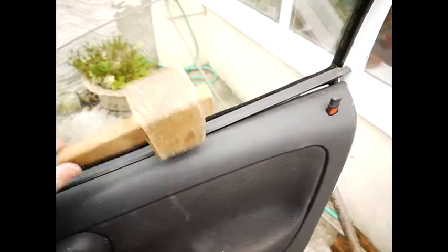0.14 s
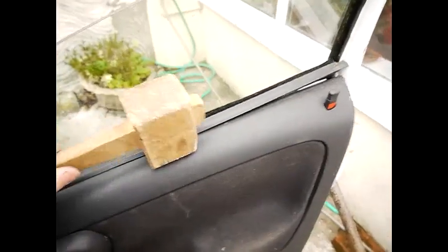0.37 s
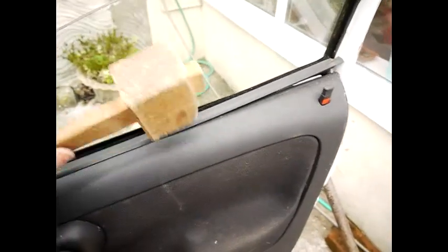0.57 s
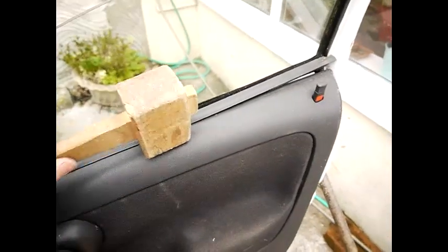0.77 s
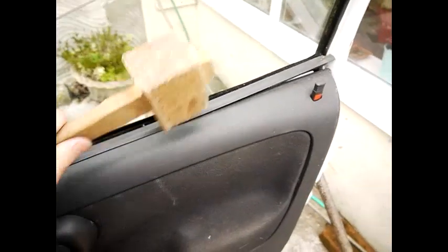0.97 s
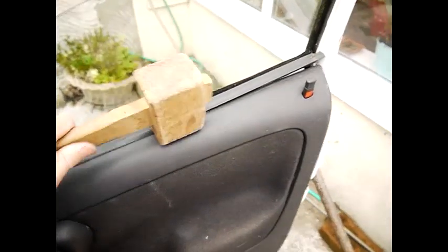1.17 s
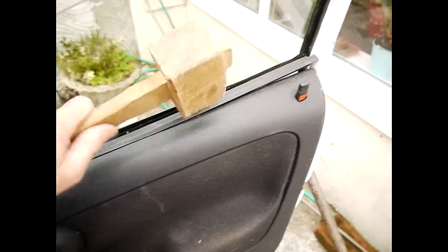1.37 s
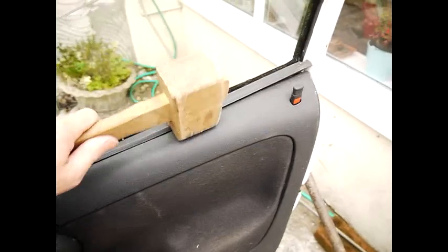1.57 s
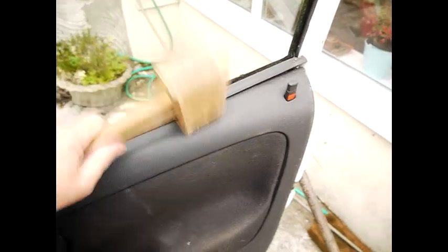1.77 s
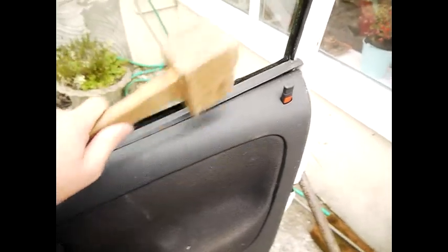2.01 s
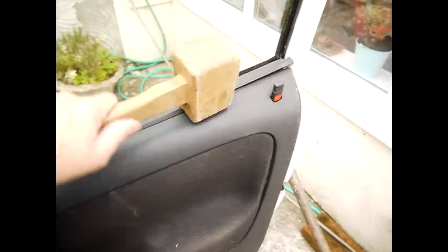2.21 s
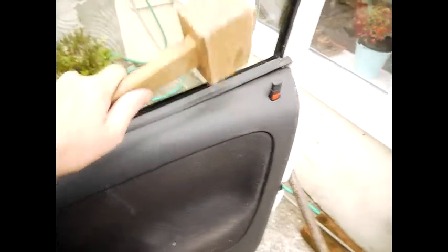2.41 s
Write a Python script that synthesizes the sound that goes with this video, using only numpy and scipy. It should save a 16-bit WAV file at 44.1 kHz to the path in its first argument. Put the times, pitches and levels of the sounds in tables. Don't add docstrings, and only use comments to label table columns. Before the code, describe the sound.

Wooden mallet knocking hard on a plastic car door trim, dull taps alternating with loud rattling blows

```python
import sys
import numpy as np
from scipy import signal
from scipy.io import wavfile
from scipy.ndimage import uniform_filter1d

SR = 44100
rng = np.random.default_rng(int(sys.argv[2]) if len(sys.argv) > 2 else 0)


def to_wav(sig):
    pcm = np.clip(np.atleast_2d(sig), -1, 1) * 32767
    pcm = np.round(pcm).astype(np.int16)
    wavfile.write(sys.argv[1], SR, pcm.T)


def gain_from_db(level_db):
    decades = np.asarray(level_db, float) / 20
    return 10 ** decades


N = 108045

# pitch_hz, level_db
ROAD_COLOUR = [(30, -23.5), (80, -6), (115, -14.5), (160, -6.5), (800, -4.5), (2500, -16), (6300, -30),
               (12000, -62)]
# pitch_hz, width_hz, level_db
ROAD_HUMS = [(150, 25, 5), (950, 300, 5), (1780, 200, 5)]
# time_s, level_db
ROAD_LEVEL = [(0, -2), (.15, 5), (.6, 2.5), (1, -0.5), (1.35, -0.5), (1.75, -2.5), (2.1, -3.5), (2.45, -1)]
# pitch_hz, likeness_0_to_1
PORT_LIKENESS = [(60, 0.77), (240, 0.9), (950, 1.0), (3770, 0.97), (15000, 0.66)]
# start_s, peak_db, thud_pitch_hz
TAPS = [
    (-.012, -3, 800),
    (.2236, -5, 800),
    (.6615, -4.5, 780),
    (1.0576, .5, 800),
    (1.4184, -3.5, 800),
    (1.5872, -14, 800),
    (1.9922, -2.5, 880),
    (2.1223, .5, 800),
]
# door_ring_db, rattle_db, tick_db
TAP_SHARES = [(-7.5, -8, -6), (-5, -8, -9), (-5, -10.5, -3), (-5, -7.5, 6), (-8.5, -7.5, -3),
              (-17, -14, -3), (-12.5, -5, 6), (-6, -5, 1.5)]
# pitch_hz, level_db, t60_s
DOOR_MODES = [(179.2, -9.5, 0.36), (245.3, -9, .25), (289.4, -14, .3), (347.3, -4.5, 0.26),
              (373.6, -5.5, 0.31), (400.5, -0.5, 0.26), (477, 1, 0.12), (515, -11, 0.17), (626, -9.5, .14),
              (697, -12, 0.19), (826, -7, 0.043), (936.5, -7, 0.14), (1200, 1.5, 0.066),
              (1620, -25.5, 0.024)]
# pitch_hz, level_db, t60_s
TRIM_MODES = [(670, -6, .04), (880, -6, .04), (1160, -6, .035), (1450, -10, .04), (1760, -9, .04),
              (2350, 0, .035), (2600, -2, .035), (3050, -9, .04), (3500, -12, .04), (4600, -18, .03)]
# pitch_hz, level_db_per_hz
RATTLE_COLOUR = [(60, -40), (150, -14.5), (370, -3.5), (960, -2.5), (2400, -11.5), (4500, -28.5),
                 (8000, -47), (15000, -85.5)]
# pitch_hz, t60_s
RATTLE_T60 = [(100, 0.91), (300, 0.38), (700, 0.097), (1800, 0.056), (5000, 0.088), (12000, .05)]
# pitch_hz, level_db
YARD_TILT = [(200, -4), (1000, 8.5), (3500, 5.5), (8000, 8.5)]
# start_s, end_s, pitch_hz, width_share, level_db
FAR_TONES = [
    (.43, .66, 7900, .01, -82),
    (.12, .19, 5300, .12, -74),
]
# start_s, peak_db, pitch_hz, t60_s
CREAKS = [(.195, -45, 600, .04), (.33, -30, 1100, .07), (.585, -52, 1800, .03), (1.11, -47, 3300, .25),
          (1.16, -41, 900, .04), (1.485, -48, 3500, .25), (1.855, -33, 420, .04), (1.98, -54, 3500, .02),
          (2.18, -45, 3100, .35), (2.275, -40, 400, .04), (2.316, -56, 3000, .02)]
# start_s, peak_before_overload_db, end_pitch_hz, swings, rattle_db
BLOWS = [
    (0.2666, 7, 810, 1.74, 10.5),
    (0.2773, 11, 480, 1.46, 5.5),
    (.3230, -6, 1300, 1.4, 1),
    (0.7053, 10, 407, 1.844, 7),
    (1.0856, 14.5, 350.5, 1.74, 8),
    (1.457, 18.5, 387, 1.556, 7.5),
    (1.8066, 10, 602, 1.86, 9.5),
    (2.1529, 10, 680, 2.34, 6),
]


def evened(x):
    return x / np.sqrt(np.mean(x ** 2) + 1e-20)


def read(points, hz):
    f, value = np.transpose(points)
    return np.interp(np.log(hz + 1), np.log(f + 1), value)


def add(mix, s, sound):
    at = round(s * SR)
    sound = sound[max(-at, 0):]
    part = mix[max(at, 0):][:len(sound)]
    part += sound[:len(part)]


def span(s):
    return np.arange(0, s, 1 / SR)


def band(x, lo_hz, hi_hz):
    sos = signal.butter(2, [lo_hz, min(hi_hz, .45 * SR)], "band", fs=SR, output="sos")
    return signal.sosfilt(sos, x)


def road():
    road_db, patch_db, swell_db = -49, 1, 1.89
    frames, hz = N // 256 + 5, np.fft.rfftfreq(1024, 1 / SR)
    a, b, c, d, patches = rng.standard_normal((frames, 513, 5)).T
    patches = uniform_filter1d(patches, size=10, axis=0)
    patches = evened(uniform_filter1d(patches, size=14, axis=1))
    t = np.arange(frames) * 256 / SR
    swell_hz = np.geomspace(.3, 5, num=20)
    swell = evened(sum(np.sin(2 * np.pi * (f * t + rng.random())) / np.sqrt(f) for f in swell_hz))
    hums = sum(db * np.exp(-((hz - f) / width) ** 2) for f, width, db in ROAD_HUMS)
    colour = read(ROAD_COLOUR, hz) + hums
    same = np.clip(read(PORT_LIKENESS, hz), -1, 1)[:, None]
    left = a + 1j * b
    right = same * left + np.sqrt(1 - same ** 2) * (c + 1j * d)
    drift_db = np.interp(t, *np.transpose(ROAD_LEVEL))
    level_db = colour[:, None] + patch_db * patches + swell_db * swell + drift_db
    z = np.array([left, right]) * gain_from_db(level_db)
    return gain_from_db(road_db) * evened(signal.istft(z, nperseg=1024, noverlap=768)[1][:, :N])


def ring(modes, rise_s):
    spread_db = 5
    t, (hz, db, t60) = span(.6), np.transpose(modes)[:, :, None]
    level_luck, pitch_luck, phase_luck = rng.standard_normal((3, len(modes), 1))
    start = np.pi * np.arange(len(modes))[:, None] + 1.2 * phase_luck
    fall = gain_from_db(db + spread_db * level_luck - 60 * t / t60)
    waves = fall * np.sin(2 * np.pi * hz * (1 + .01 * pitch_luck) * t + start)
    return (1 - np.exp(-t / rise_s)) * waves.sum(0)


def rattle():
    yard_db, yard_t60_s = -27.5, 0.41
    hz, t, z = signal.stft(rng.standard_normal(SR // 2 + 4000), SR, nperseg=256, noverlap=192)
    colour = gain_from_db(read(RATTLE_COLOUR, hz))[:, None]
    panel = gain_from_db(-60 * t / read(RATTLE_T60, hz)[:, None])
    yard = gain_from_db(yard_db + read(YARD_TILT, hz)[:, None] - 60 * t / yard_t60_s)
    x = signal.istft(z * colour * (panel + yard), SR, nperseg=256, noverlap=192)[1]
    rise = np.minimum(span(1)[:len(x)] / 0.001, 1)
    return x / np.sqrt(np.mean(colour ** 2)) * rise


def tap(db, hz, ring_db, rattle_db, tick_db):
    door_db, trim_db, dull_db, dull_hz = -13.5, -31.5, -11.5, 1400
    tick_level_db, tick_hz, tick_spread, tick_t60_s = -31, 4000, 1.6, 0.0082
    t = span(.6)
    contact = np.exp(-((hz * t - 0.67) / 0.5) ** 2)
    thud = contact * np.sin(2 * np.pi * hz * t) * np.minimum(10 * hz * t, 1)
    tick = band(rng.standard_normal(len(t)), tick_hz / tick_spread, tick_hz * tick_spread)
    tick = evened(band(tick, 1400, 5100))
    tick = gain_from_db(tick_level_db + tick_db - 60 * t / tick_t60_s) * tick * np.minimum(t / 0.00079, 1)
    dull = band(rattle()[:len(t)], 169, dull_hz)
    dull = band(dull, 170, 2 * dull_hz)
    dull = np.pad(dull, (0, len(t) - len(dull)))
    after = gain_from_db(door_db + ring_db) * ring(DOOR_MODES, 0.001)
    after = after + gain_from_db(dull_db + rattle_db) * dull
    after = after + gain_from_db(trim_db + rattle_db) * ring(TRIM_MODES, .0005)
    return gain_from_db(db) * (thud + tick) + after


def far_tones():
    t, out = np.arange(N) / SR, np.zeros(N)
    for start, end, hz, share, db in FAR_TONES:
        on = np.clip(np.minimum(t - start, end - t) / .03, 0, 1)
        tone = evened(band(rng.standard_normal(N), hz * (1 - share), hz * (1 + share)))
        out += gain_from_db(db) * on * tone
    return out


def creak(db, hz, t60):
    t = span(.25)
    noise = evened(band(rng.standard_normal(len(t)), hz / 1.1, hz * 1.06))
    return gain_from_db(db - 60 * t / t60) * noise * np.minimum(20 * t / t60, 1)


def blow(db, end_hz, swings, rattle_db):
    start_hz, glide_s, rise_s = 1741, 0.000597, .0006
    crack_db, crack_t60_s = -18.5, 0.014
    door_db, trim_db, loose_db = -36, -19, -24.5
    t = span(.6)
    turns = np.cumsum(end_hz + (start_hz - end_hz) * np.exp(-t / glide_s)) / SR
    contact = np.minimum(t / rise_s, 1) * np.exp(-(turns / swings) ** 6)
    swing = -contact * np.sin(2 * np.pi * turns)
    crack = band(rng.standard_normal(len(t)), 1800, 4620)
    crack = evened(band(crack, 1200, 4300))
    crack = gain_from_db(crack_db - 60 * t / crack_t60_s) * crack * np.minimum(t / 0.00025, 1)
    loose = band(rattle()[:len(t)], 110, 13000)
    loose = np.pad(loose, (0, len(t) - len(loose)))
    after = gain_from_db(door_db) * ring(DOOR_MODES, .002) + gain_from_db(trim_db) * ring(TRIM_MODES, 0.00033)
    after = after + gain_from_db(loose_db) * loose + crack
    return gain_from_db(db) * swing + gain_from_db(rattle_db) * after


def knocks():
    mix = np.zeros(N)
    for (s, *row), shares in zip(TAPS, TAP_SHARES):
        add(mix, s, tap(*row, *shares))
    for s, *row in CREAKS:
        add(mix, s, creak(*row))
    for s, *row in BLOWS:
        add(mix, s, blow(*row))
    return mix


def scene():
    treble_side_db, low_side_db, lean_db = -11, -25, .4
    hits = knocks()
    side = gain_from_db(treble_side_db) * np.roll(band(hits, 3500, 15000), shift=3)
    side = side + gain_from_db(low_side_db) * np.roll(band(hits, 40, 1500), shift=12)
    ports = np.array([(hits + side) * gain_from_db(-lean_db), hits - side])
    return ports + road() + far_tones()


def top_cut(x):
    return signal.sosfilt(signal.butter(12, 16510, fs=SR, output="sos"), x)


def record(dry):
    low_hz, top_hz, ceiling, knee = 130, 7200, 1.0, 16
    thin = signal.sosfilt(signal.butter(2, low_hz, "high", fs=SR, output="sos"), dry)
    clipped = thin / (1 + abs(thin / ceiling) ** knee) ** (1 / knee)
    dull = signal.sosfilt(signal.butter(1, top_hz, fs=SR, output="sos"), clipped)
    return top_cut(dull)


dry = scene()
out = record(dry)
to_wav(out)
```